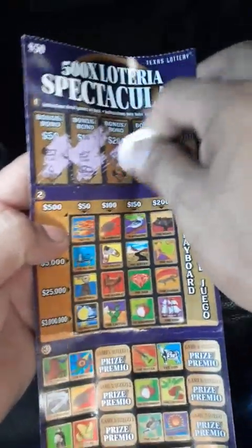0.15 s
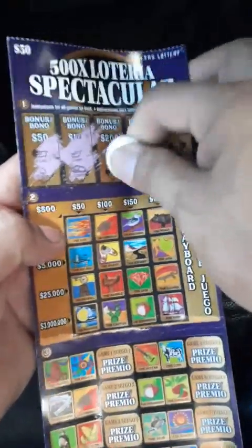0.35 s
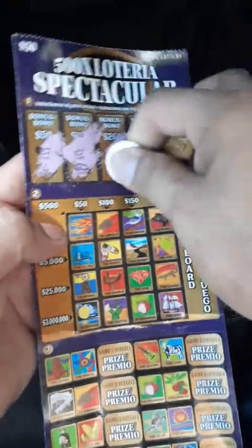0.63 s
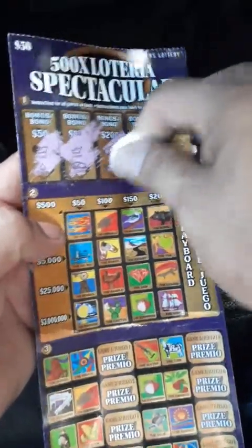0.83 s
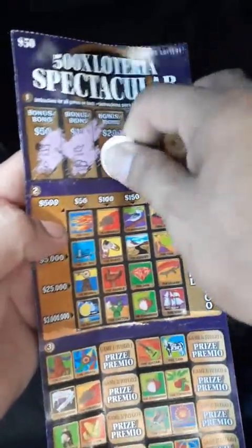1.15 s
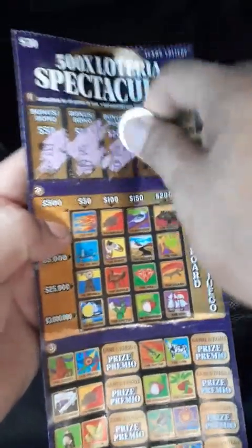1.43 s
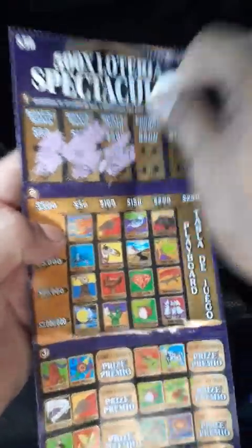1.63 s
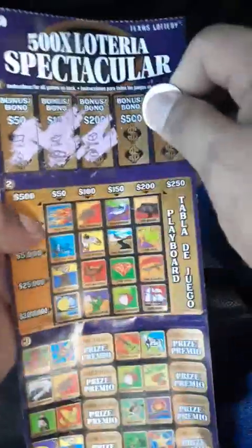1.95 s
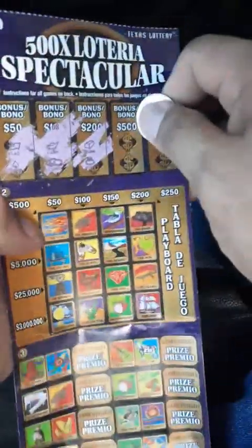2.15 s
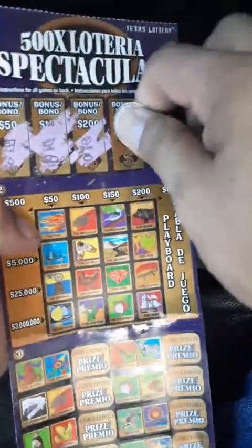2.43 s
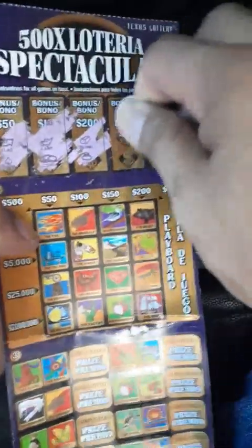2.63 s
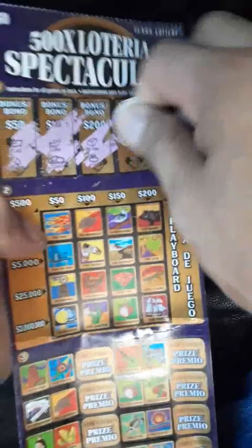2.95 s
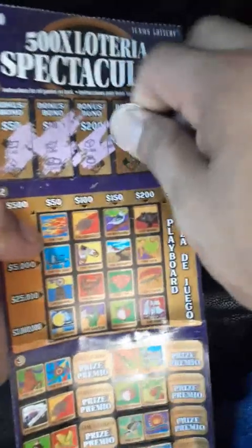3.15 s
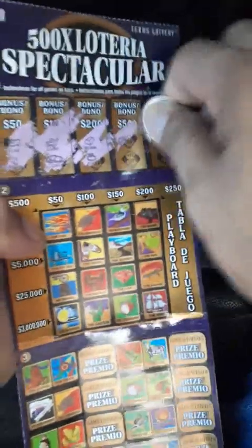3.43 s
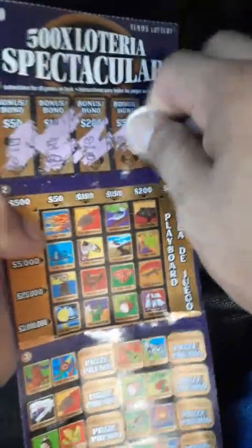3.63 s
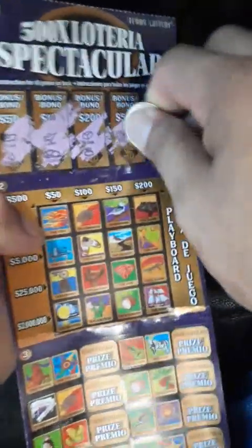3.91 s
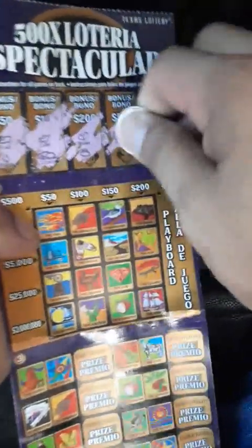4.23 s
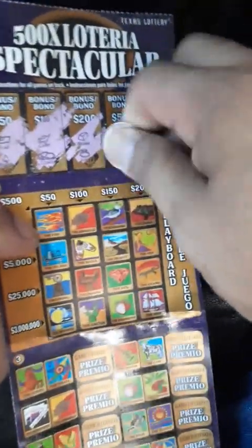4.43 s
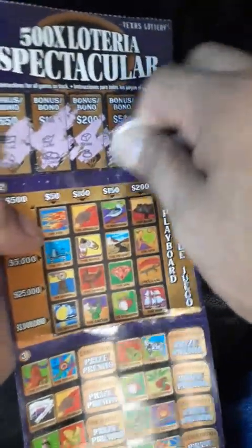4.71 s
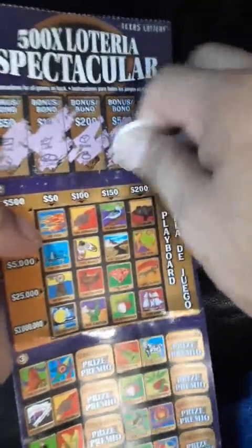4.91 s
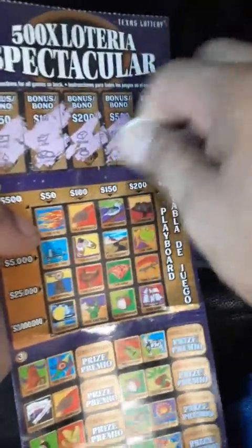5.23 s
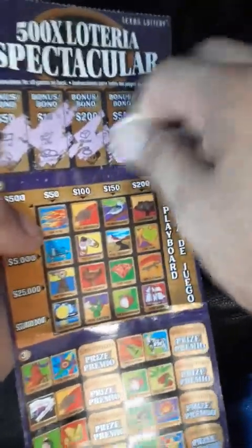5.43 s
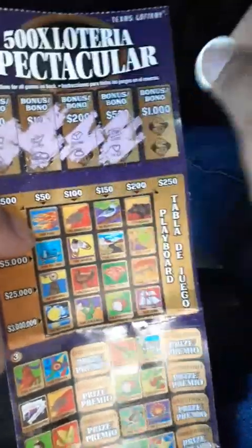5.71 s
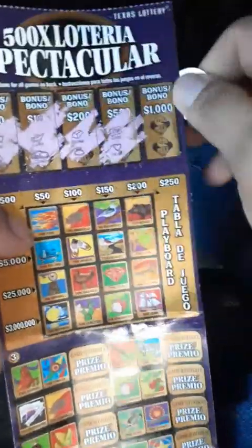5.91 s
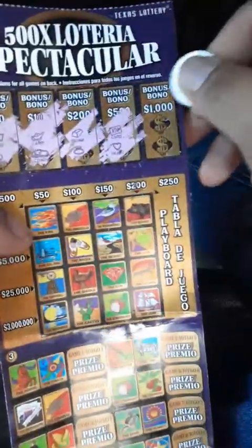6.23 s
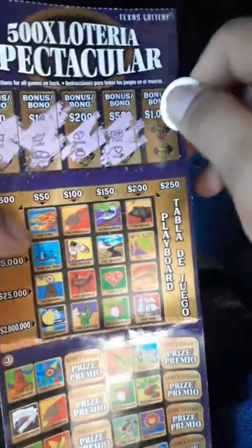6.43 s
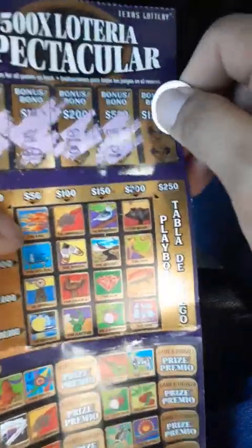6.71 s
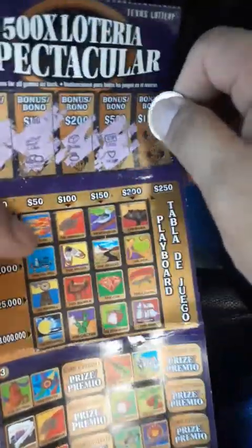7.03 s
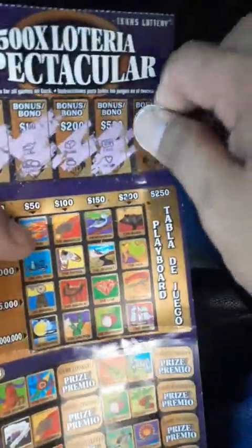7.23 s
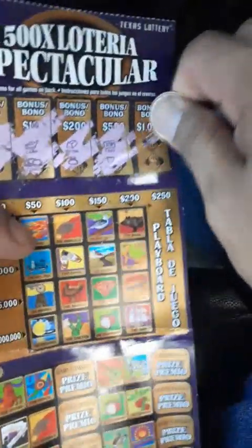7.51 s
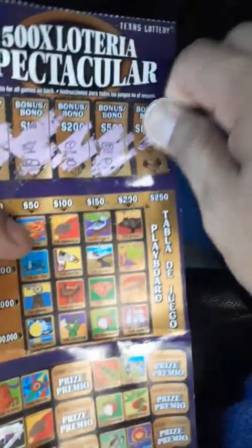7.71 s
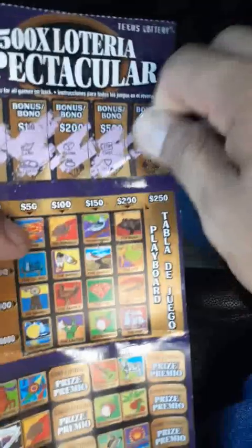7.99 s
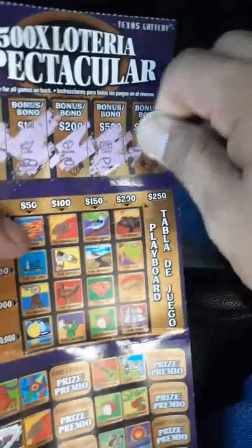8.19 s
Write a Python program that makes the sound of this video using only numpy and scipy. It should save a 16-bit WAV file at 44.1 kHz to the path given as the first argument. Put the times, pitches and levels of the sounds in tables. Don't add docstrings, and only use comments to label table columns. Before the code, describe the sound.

A low, even engine idle and soft blower hiss fill a small, padded vehicle cabin throughout. Very close, more to the right, a coin scrapes a stiff card: gritty, papery strokes of under a tenth of a second, outward ones usually stronger than returns. They begin at once, somewhat uneven, until about 1.6 s, when the card snaps. Light brushing and rustling follow, with a quick, slowing creak near 2.2 s. From 2.35 to 5.6 s the scratching runs fast and regular, about nine strokes a second, loudest around 3.5 s; a dull soft knock falls near 2.75 s, and a deep card pop at 4.14 s. A cluster of sharp snaps ends the run at 5.6 s. Until 7.1 s there is mostly engine hum, with faint rustles and small clicks near 6.6 and 6.9 s. Then steady, slightly lighter scraping resumes and continues to the end at about 8.4 s.

```python
import sys
import numpy as np
from scipy import signal
from scipy.io import wavfile
from scipy.ndimage import uniform_filter1d

SR = 44100
rng = np.random.default_rng(int(sys.argv[2]) if len(sys.argv) > 2 else 0)


def to_wav(s):
    ch = np.atleast_2d(s).T
    pcm = np.round(np.clip(ch, -1, 1) * 32767)
    wavfile.write(sys.argv[1], SR, pcm.astype(np.int16))


def volts_from_db(level):
    exponent = np.asarray(level, float) / 20
    return 10 ** exponent


N = 368676

# time_s, looseness_0_to_1, left_port_shading_db, pitch_hz of the patch under the coin
HOLD = [(0, 0.62, -16.5, 5120), (.3, 0.84, -2.5, 4960), (.7, 0.5, -12, 5300), (1.1, 0.79, -12.5, 5200),
        (1.6, 1, -3.5, 4930), (2.4, 0.29, -12, 4600), (2.7, 0.35, -16, 4630), (3.0, 0.35, -3, 4940),
        (3.45, 0.22, -16, 4920), (4.2, 0.33, -5, 4900), (4.5, 0, -13, 5280), (4.85, 0.4, -9, 5150),
        (5.4, .05, -8.5, 5400), (5.7, 1, -10.5, 4980), (6.9, 0.1, -4.5, 4050), (7.3, 0.47, -11, 3960),
        (7.9, 0.2, -4, 3840), (8.36, 0.5, -12.5, 3820)]
# pitch_hz, width_hz, level_db
CARD_MODES = [(1566, 130, 5.5), (3150, 120, 3.5), (3990, 85, 5.5), (5180, 100, 3.5), (7200, 45, -7.5),
              (7630, 99, 0.5)]


def evened(x):
    return x / np.sqrt(np.mean(x ** 2) + 1e-20)


def read(points, hz):
    f, value = np.transpose(points)
    return np.interp(np.log(hz + 1), np.log(f + 1), value)


def humps(peaks, hz):
    return sum(db * np.exp(-(2 * (hz - f) / width) ** 2) for f, width, db in peaks)


def patches(shape, bins, frames):
    field = rng.standard_normal(shape)
    field = uniform_filter1d(field, int(bins), axis=0)
    return evened(uniform_filter1d(field, int(frames), axis=1))


def add(mix, start_s, sound):
    part = mix[:, round(start_s * SR):][:, :sound.shape[1]]
    part += sound[:, :part.shape[1]]


def cabin():
    # frequency_hz, level_db per Hz
    air_colour = [(24, -60.5), (33, -33), (45, -14), (70, -6.5), (146, -8), (232, -11), (340, -14.5),
                  (430, -19.5), (500, -23.5), (1230, -25.5), (1690, -40), (2970, -54.5), (6990, -58),
                  (8720, -76)]
    # frequency_hz, likeness_0_to_1
    likeness = [(60, .98), (330, .94), (500, .55), (1000, .45), (2000, .4), (4000, .2)]
    # frequency_hz, left_minus_right_db
    balance = [(60, -11.5), (100, 13.5), (180, -1.5), (310, 2.5), (540, -0.5), (930, -5.5), (1600, -6),
               (2770, 1.5), (4780, -11), (8270, -13)]
    # frequency_hz, lead_rad
    lead = [(60, -0.33), (400, -0.062), (690, -2.25), (1550, -2)]
    # pitch_hz, width_hz, level_db
    boom = (329.5, 18, 8)
    hz = np.fft.rfftfreq(2048, 1 / SR)
    a, b, c, d = rng.standard_normal((4, len(hz), N // 512 + 5))
    same = np.clip(read(likeness, hz), -.999, .999)[:, None]
    right = a + 1j * b
    left = same * right * np.exp(1j * read(lead, hz))[:, None]
    left = left + np.sqrt(1 - same ** 2) * (c + 1j * d)
    half_db = read(balance, hz)[:, None] / 2
    z = np.array([left * volts_from_db(half_db), right * volts_from_db(-half_db)])
    colour_db = (read(air_colour, hz) + humps([boom], hz))[:, None]
    z *= volts_from_db(colour_db + 0.59 * patches(a.shape, 14, 6))
    air = signal.istft(z, nperseg=2048, noverlap=1536)[1][:, :N]
    sealed = signal.butter(6, 40, "high", fs=SR, output="sos")
    return volts_from_db(-37.5) * evened(signal.sosfilt(sealed, air))


def engine():
    # time_s, turns_per_minute
    idle = [(0.5, 600.4), (1.0, 596.5), (1.5, 597.1), (2.0, 596.7), (2.5, 596.1), (3.0, 592.1),
            (3.5, 594.9), (4.0, 600.0), (4.5, 592.9), (5.0, 592.5), (5.5, 589.1), (6.0, 596.8),
            (6.5, 601.5), (7.0, 595.6), (7.5, 591.4)]
    # multiple, level_db rms
    orders = [(8, -44.3), (11, -41.5), (12, -53.7), (13, -38.5), (14, -48.9), (15, -44.3), (16, -33.3),
              (17, -49.4), (19, -47.5), (21, -49.8), (23, -52.1), (24, -39.1), (27, -45.2), (30, -51.0),
              (32, -43.6), (35, -53.7), (43, -55.0)]
    start_cycles, firing_spread = .48, .3015
    lag_s = np.array([[0.000083], [0]])
    t = np.arange(N) / SR
    cycles = np.cumsum(np.interp(t, *np.transpose(idle))) / (2 * 60 * SR)
    cycles = start_cycles + cycles - lag_s * np.mean(idle, 0)[1] / (2 * 60)
    out = np.zeros((2, N))
    for multiple, db in orders:
        wobble = rng.standard_normal(86)
        swell_db = 0.27 * np.interp(t, np.linspace(0, t[-1], len(wobble)), wobble)
        phase = 2 * np.pi * multiple * (cycles + firing_spread * multiple)
        out += volts_from_db(db + swell_db) * np.sqrt(2) * np.cos(phase)
    return out * volts_from_db([[-.9], [.9]])


def bump():
    # start_s, peak_db, pitch_hz, t60_s
    knocks = [
        (2.743, -25, 61.3, 0.23),
    ]
    t = np.arange(SR // 4) / SR
    out = np.zeros((2, N))
    for s, db, hz, t60 in knocks:
        onset = 1 - np.exp(-(t / 0.0071) ** 2)
        knock = onset * volts_from_db(db + 3.5 - 60 * t / t60) * np.sin(2 * np.pi * hz * t)
        add(out, s, np.array([knock, knock]))
    return out


def rustle():
    # time_s, level_db
    pressure = [(0.0, -56.5), (0.16, -48.5), (0.54, -60), (1.05, -56.5), (1.51, -46.5), (1.95, -60.5),
                (2.56, -59), (2.91, -54.5), (4.0, -55), (5.24, -58), (5.49, -55), (5.63, -60),
                (6.05, -67.5), (6.31, -74), (6.61, -60), (6.85, -50.5), (7.06, -60.5), (8.36, -58)]
    # frequency_hz, level_db per Hz; then frequency_hz, left_minus_right_db
    skin = [
        [(880, -21.5), (1500, 1), (2460, -4), (3040, -4.5), (3370, -8), (4080, -5.5), (5400, -8.5),
         (7360, -10.5), (8720, -30), (11300, -63), (19200, -120)],
        [(60, -2.5), (120, 4.5), (250, -6), (500, -1.5), (1000, -23.5), (2020, -5), (4090, -2), (8270, -6.5)],
    ]
    t = np.arange(N) / SR
    grit = volts_from_db(2.4 * np.minimum(rng.exponential(1, N // 64 + 1), 4)).repeat(64)[:N]
    drive = evened(grit * rng.standard_normal((2, N))) * volts_from_db(np.interp(t, *np.transpose(pressure)) - 1)
    hz, _, z = signal.stft(drive, SR, nperseg=512, noverlap=384)
    colour = volts_from_db(read(skin[0], hz) + 1.2 * humps(CARD_MODES, hz))
    colour = colour / np.sqrt(np.mean(colour ** 2 * (hz > 2800)))
    left_only = np.array([[[1]], [[0]]])
    side_db = left_only * read(skin[1], hz)[:, None]
    z *= colour[:, None] * volts_from_db(side_db + 2.9 * patches(z.shape[1:], 4.5, 24))
    return signal.istft(z, SR, nperseg=512, noverlap=384)[1][:, :N]


def creak(count=9):
    start_s, gap_s, slowing_s = 2.2215, .0148, .0002
    peak_db, swell_db, pitch_hz, cycles = -30.5, -0.3, 1400, 0.85
    return [(start_s + k * gap_s + k * k * slowing_s, peak_db + k * swell_db, pitch_hz, cycles)
            for k in range(count)]


def snaps():
    # start_s, peak_db, pitch_hz, ringing_cycles
    buckles = [(0.206, -36.5, 1490, 0.53), (0.761, -34.5, 1440, 0.53), (1.562, -16.5, 1280, 2.9),
               (1.701, -30, 940, 1.4), (3.8009, -19, 950, 0.96), (4.1366, -7, 783, 0.35),
               (5.6085, -21, 1060, 1.8), (5.6112, -27.5, 1190, .55), (5.6157, -12, 1090, 0.84),
               (5.6275, -17, 1170, 0.87), (5.835, -30, 1460, 1.6), (6.311, -31.5, 670, 0.51),
               (6.6, -43, 1510, 0.62), (6.621, -36.5, 1500, 0.74), (6.891, -28, 517, 0.39),
               (6.949, -30.5, 900, .6), (6.966, -34, 1540, 0.88), (6.986, -30, 1520, 1.2)]
    crack_s, overtone, body_hz, swing_cycles = 0.0004, 2.1, 400, 1.15
    t = np.arange(1024) / SR
    out = np.zeros((2, N))
    bright = signal.butter(3, [3400, 6800], "band", fs=SR)
    for s, db, hz, cycles in list(buckles) + creak():
        turns = t * hz - swing_cycles
        rise, ring = np.exp(-(turns / 0.69) ** 2), np.exp(-(abs(turns) / cycles) ** 3.2)
        tone = np.cos(2 * np.pi * turns) + .45 * np.cos(2 * np.pi * overtone * turns)
        pop = np.where(turns < 0, rise, ring) * tone
        since = t - swing_cycles / hz
        push = 0.32 * np.exp(-(since / 0.00099) ** 2) * np.cos(2 * np.pi * body_hz * since)
        crack_db = -6 - .5 * (db + 31.5) + 9 * np.log2(hz / 1200)
        noise = signal.lfilter(*bright, rng.standard_normal((2, 1024)))
        crack = volts_from_db(crack_db) * t / crack_s * np.exp(1 - t / crack_s) * noise
        pops = np.array([np.roll(pop, 12), pop])
        add(out, s, volts_from_db(db) * ((pops + crack) * volts_from_db([[-16.5], [0]]) + push))
    return out


def strokes():
    # start_s, length_ms, level_db
    pushes = [(-.03, 70, -33), (.238, 92.4, -38.5), (.531, 64, -37.5), (.791, 78, -35),
              (1.043, 40.6, -35.5), (1.257, 43, -32), (1.462, 37.4, -35.5), (2.351, 68, -35),
              (2.589, 47.3, -32.5), (2.804, 62, -30.5), (3.03, 63.5, -29.5), (3.248, 60.6, -29),
              (3.469, 69, -26.5), (3.691, 57.5, -27.5), (3.92, 60, -32.5), (4.139, 50.5, -34.5),
              (4.346, 65.4, -30), (4.551, 74, -29), (4.779, 64, -35), (4.992, 64.6, -28.5),
              (5.218, 57.5, -31.5), (5.429, 52, -30.5), (7.121, 62, -34), (7.34, 58, -37.5),
              (7.541, 62.4, -31.5), (7.755, 63, -33), (7.971, 58.6, -32), (8.18, 51.3, -31)]
    # start_s, length_ms, level_db
    pulls = [(.116, 51, -35.5), (.412, 64, -43), (.66, 85, -40), (.922, 78, -51.5), (1.117, 99, -44),
             (1.352, 51, -35), (1.533, 79, -33.5), (2.474, 76, -41), (2.7, 65, -40), (2.916, 72, -38),
             (3.132, 73, -41.5), (3.357, 80, -34), (3.598, 57, -39), (3.796, 80, -37), (4.027, 79, -37),
             (4.254, 56, -44), (4.46, 61.5, -33), (4.672, 70, -36), (4.894, 62, -34.5), (5.111, 57, -34),
             (5.328, 61, -40), (5.519, 92, -27.5), (7.231, 69.5, -40.5), (7.447, 56, -46.5),
             (7.66, 46, -38), (7.865, 59, -42.5), (8.078, 52, -39.5), (8.275, 55.4, -37.5)]
    # fastest_s, rise_ms, fall_ms, level_db, card_flex_db
    brushes = [(1.677, 31, 48, -46.5, 4.5), (1.819, 30, 56, -53, 2), (1.889, 12, 14, -48.5, -6),
               (1.97, 57, 170, -52.5, 1.5), (2.195, 41, 34, -44.5, 0.5), (5.615, 8.2, 20, -35.5, 3),
               (5.836, 1, 30, -46, 1.5), (6.387, 130, 33, -60.5, 7), (6.565, 33, 21, -63.5, 7),
               (6.625, 39, 56, -46, 1.5), (6.846, 139, 200, -49, -11), (6.986, 39, 100, -47, -1)]
    held, loose, *_ = np.transpose(HOLD)
    rows = list(brushes)
    for table, rise, flex_db in (pushes, 0.59, -4.5), (pulls, 0.64, -3.5):
        for s, ms, db in table:
            flex = flex_db - 0.44 * (db + 36.5) + 11.5 * np.interp(s, held, loose)
            rows.append((s + rise * ms / 1000, rise * ms, (1 - rise) * ms, db, flex))
    return sorted(rows, key=lambda row: row[0] - row[1] / 1000)


def coin_motion(t):
    power, bite = np.zeros(N), np.zeros(N)
    for s, rise_ms, fall_ms, db, _ in strokes():
        u = np.where(t < s, (s - t) / (rise_ms + .1), (t - s) / fall_ms) * 1000
        edge_db = np.where(t < s, 90, 24) * np.maximum(u - 1, 0)
        power += volts_from_db(db - 9.0 * u ** 2.42 - edge_db) ** 2
        since = t - s + rise_ms / 1000
        bite += volts_from_db(db - 4.5 - 60 * abs(since) / np.where(since > 0, .07, .01)) ** 2
    return np.sqrt(power), np.sqrt(bite)


def scrape():
    # frequency_hz, level_db per Hz
    chip_colour = [(150, -36), (330, -15), (520, -17), (726, -8), (1370, -7), (1680, -4.5), (2100, -3),
                   (2500, -10), (3330, -6.5), (3720, -6), (4350, -0.5), (5330, -1), (7290, -7.5),
                   (8720, -31)]
    # frequency_hz, left_minus_right_db
    shading = [(60, 5), (94, 7), (150, -1), (230, 1), (360, 10), (560, -1), (880, -4.5), (1380, -33),
               (2160, -1), (3380, 1), (5280, -13.5), (8270, -10.5)]
    # pitch_hz, width_hz, level_db
    graze = [(4050, 300, -1.5), (5000, 1700, -2.5), (7300, 1500, 7)]
    chips_per_s, spread_db, hiss, judder_db = 5200, 3.5, 0.67, 1.5
    ring_db, likeness, lag_s = 3.0, 0.36, 0.00022
    t = np.arange(N) / SR
    sign = rng.choice([-1., 1.], N)
    size = volts_from_db(spread_db * np.minimum(rng.exponential(1, N), 3.8))
    chips = evened(sign * size * (rng.random(N) < chips_per_s / SR))
    fine, other, slow = rng.standard_normal((3, N))
    judder = volts_from_db(judder_db * evened(uniform_filter1d(uniform_filter1d(slow, 70), 70)))
    rub = np.array([evened(chips + hiss * fine), other])
    speed, bite = coin_motion(t)
    drive = np.vstack([speed * judder * rub, bite * fine])
    hz, frames, (near, apart, jolt) = signal.stft(drive, SR, nperseg=512, noverlap=384)
    f = hz[:, None]

    s, rise_ms, _, force_db, flex_db = np.transpose(strokes())
    under_way = np.maximum(np.searchsorted(s - rise_ms / 1000, frames) - 1, 0)
    force_db, flex_db = force_db[under_way], flex_db[under_way]
    held, *columns = np.transpose(HOLD)
    loose, shade_db, patch_hz = (np.interp(frames, held, column) for column in columns)

    low = 1 / (1 + (f / 2300) ** 6)
    near = near + low * jolt
    colour_db = read(chip_colour, f) + humps(CARD_MODES, f) + low * (flex_db + 7.5)
    colour_db += np.exp(-((f - 3000) / 800) ** 2) * (9 * loose - .6)
    colour_db += (3.5 * loose - 1.1) / (1 + (f / 900) ** 4)
    colour_db += np.clip((-39 - force_db) / 12, 0, 1) * humps(graze, f)
    colour_db += humps([(patch_hz, 1280, 2.5)], f)
    harder_db = 0.18 * (force_db + 28.5)
    colour_db += (10 * loose - 2.0 + harder_db) / (1 + (6600 / (f + 1)) ** 8)
    colour_db -= 10 * np.log10(np.mean(volts_from_db(2 * read(chip_colour, hz)) * (hz > 3000)))

    same = likeness ** ((f / (f + 500)) ** 2)
    far = same * near * np.exp(-2j * np.pi * f * lag_s) + np.sqrt(1 - same ** 2) * apart
    far = far * volts_from_db(read(shading, f) + shade_db + 2)
    ports = []
    for port in far, near:
        ringing_db = ring_db * patches(near.shape, 1.6, 16) + 1.58 * patches(near.shape, 8.3, 7.2)
        ports.append(port * volts_from_db(colour_db + ringing_db))
    return volts_from_db(-4.0) * signal.istft(np.array(ports), SR, nperseg=512, noverlap=384)[1][:, :N]


def echoes(x):
    t60_s, changes_per_s, count, length = 0.022, 2.3, 5, 3000
    taps = np.zeros((count, 2, length))
    at = np.arange(60, 2980, 20) + rng.integers(0, 20, (count, 2, 146))
    np.put_along_axis(taps, at, rng.choice([-1., 1.], at.shape), 2)
    taps *= volts_from_db(-60 * np.arange(length) / SR / t60_s)
    place = (np.arange(N) / SR * changes_per_s - np.arange(count)[:, None]) % count
    shares = np.sin(np.pi / 2 * np.minimum(place, 2))
    out = np.zeros((2, N))
    for share, tap in zip(shares, taps):
        sent = (x[1] * share)[None]
        out += signal.oaconvolve(sent, tap / np.linalg.norm(tap[0]), axes=1)[:, :N]
    return out


def scene():
    card = scrape() + snaps()
    background = cabin() + engine() + bump()
    return background + rustle() + card + volts_from_db(-11.0) * echoes(card)


def top_cut(x):
    return signal.sosfilt(signal.butter(12, 8800, fs=SR, output="sos"), x)


def record(dry):
    risen = dry * volts_from_db(-4 * np.exp(-np.arange(N) / SR / 0.12))
    ceiling = .36
    rounded = risen / (1 + (risen / ceiling) ** 4) ** .25
    return top_cut(rounded)


dry = scene()
out = record(dry)
to_wav(out)
```